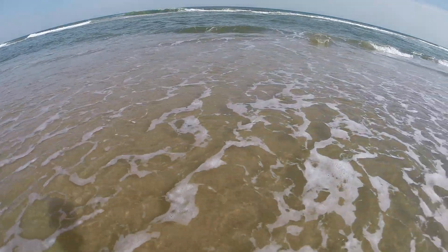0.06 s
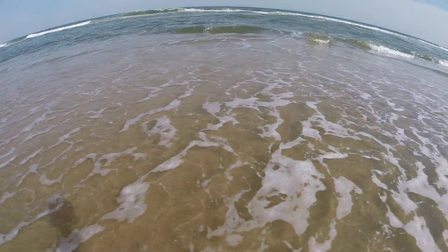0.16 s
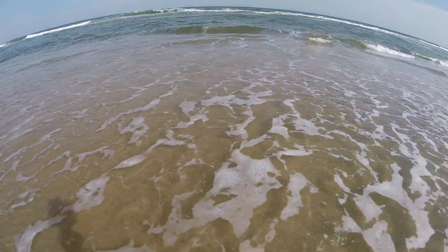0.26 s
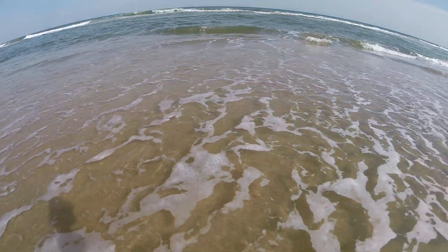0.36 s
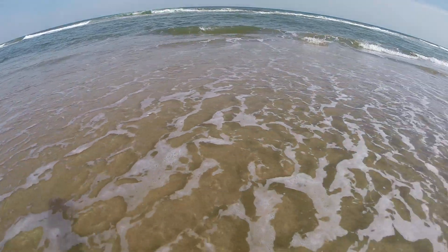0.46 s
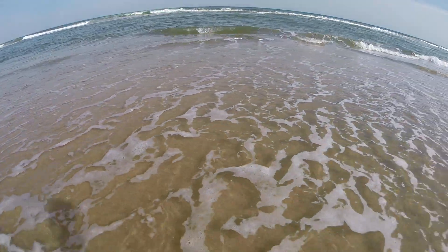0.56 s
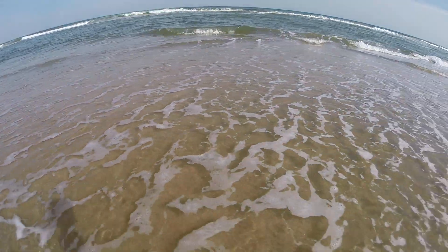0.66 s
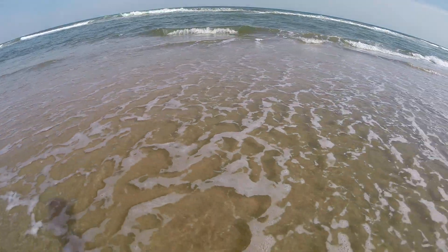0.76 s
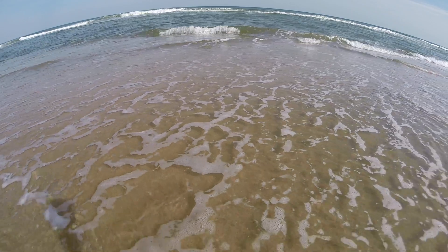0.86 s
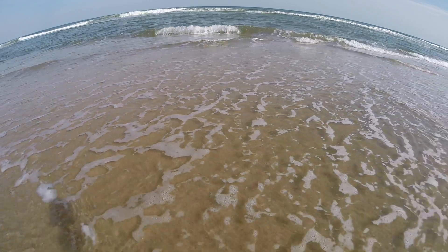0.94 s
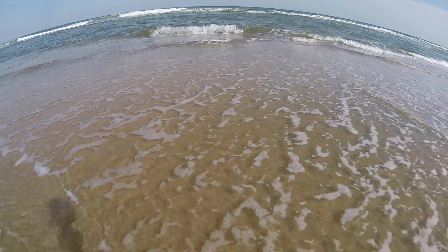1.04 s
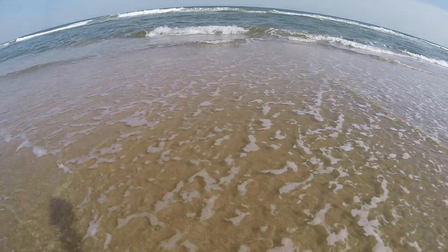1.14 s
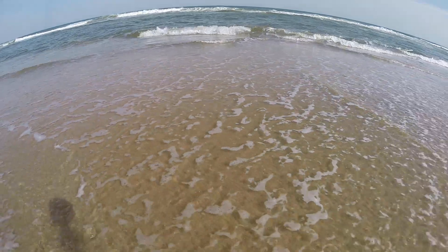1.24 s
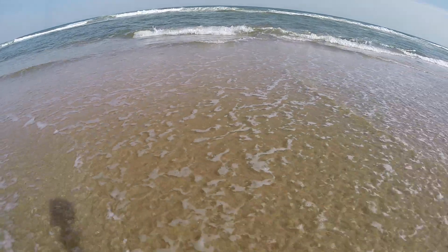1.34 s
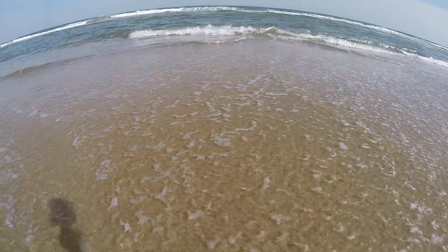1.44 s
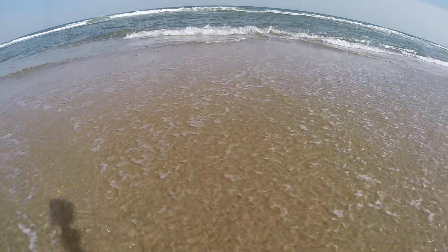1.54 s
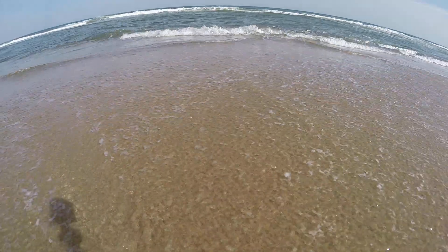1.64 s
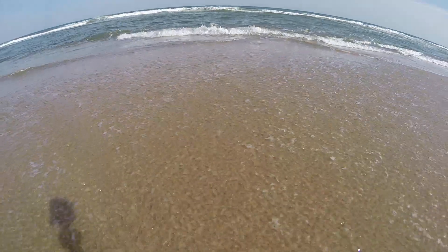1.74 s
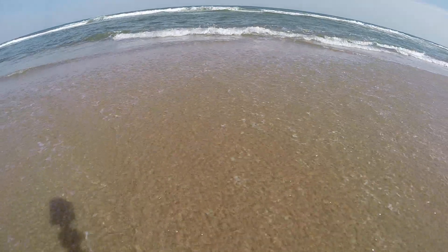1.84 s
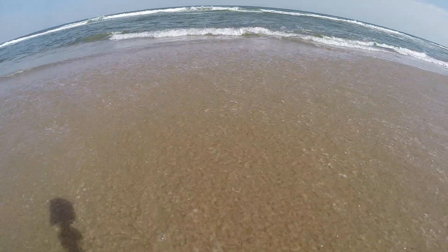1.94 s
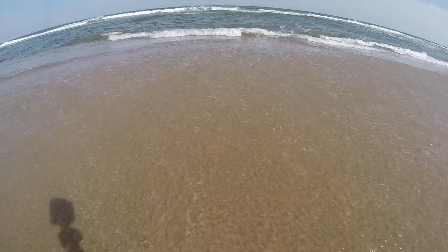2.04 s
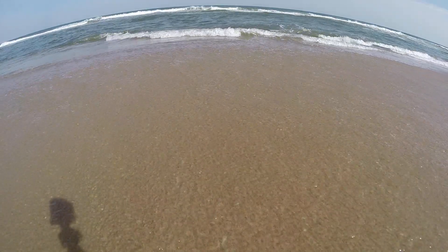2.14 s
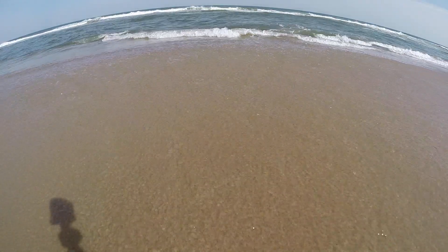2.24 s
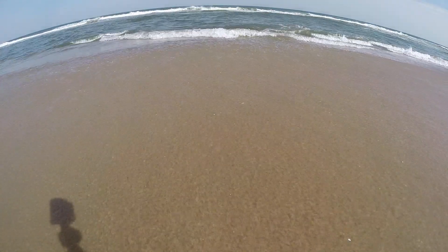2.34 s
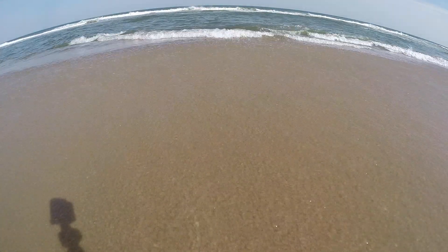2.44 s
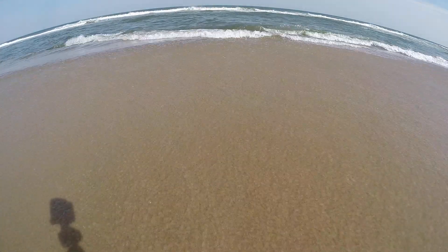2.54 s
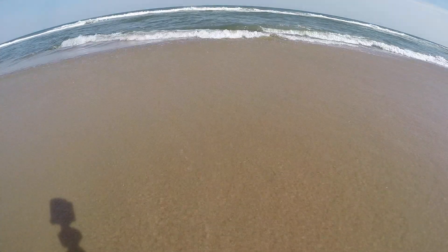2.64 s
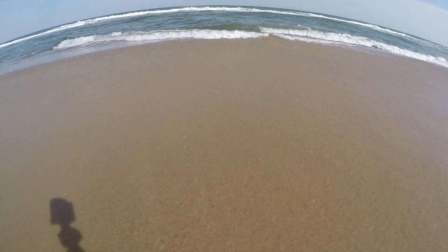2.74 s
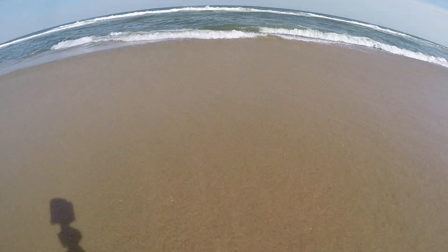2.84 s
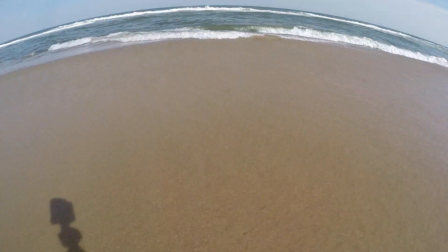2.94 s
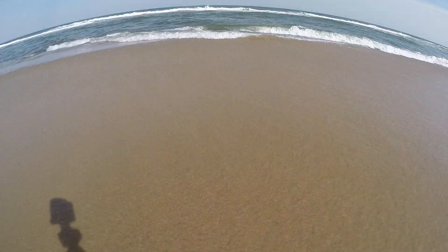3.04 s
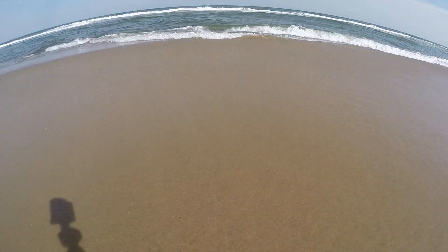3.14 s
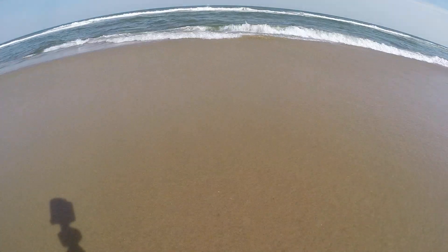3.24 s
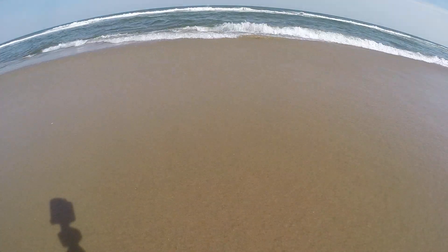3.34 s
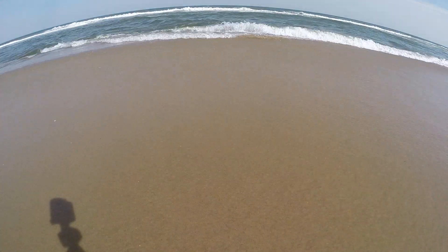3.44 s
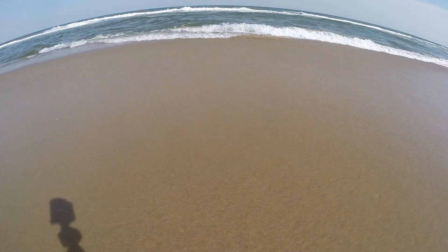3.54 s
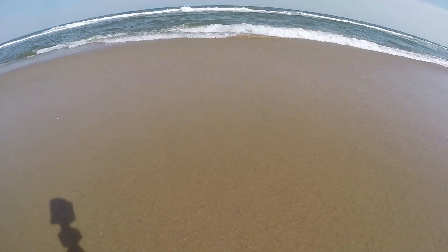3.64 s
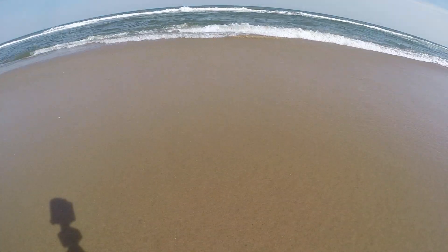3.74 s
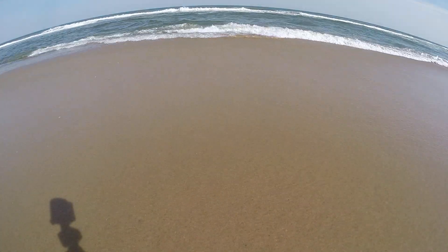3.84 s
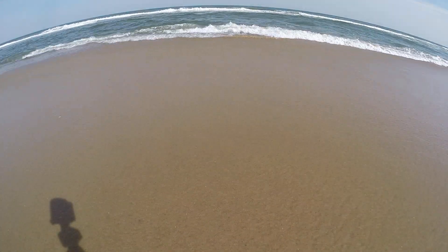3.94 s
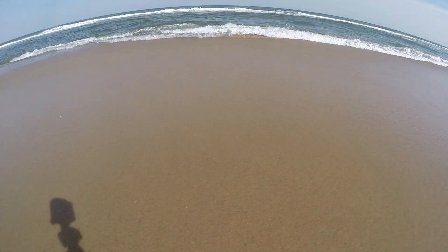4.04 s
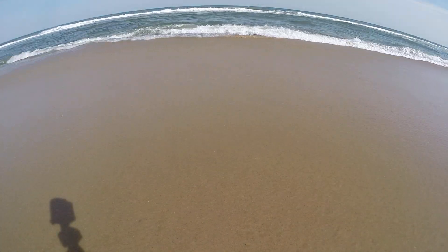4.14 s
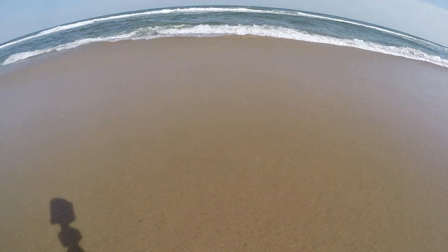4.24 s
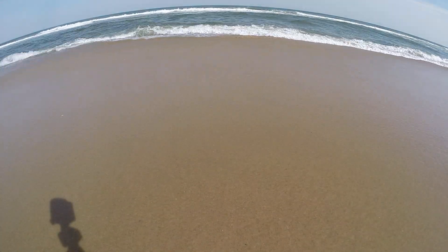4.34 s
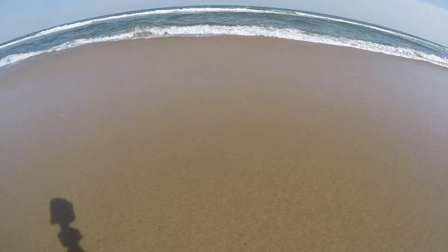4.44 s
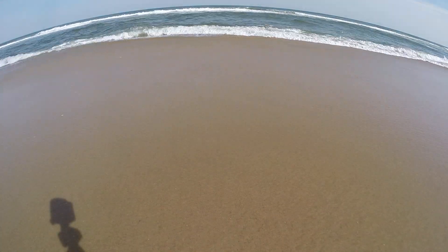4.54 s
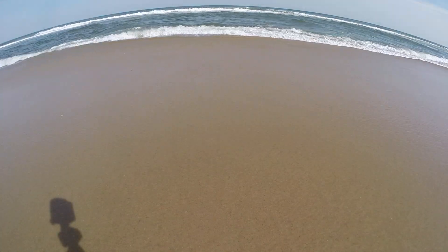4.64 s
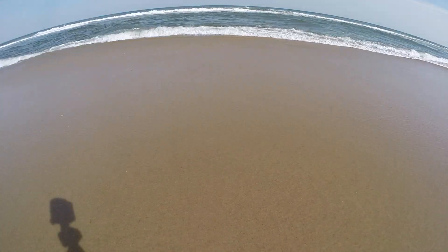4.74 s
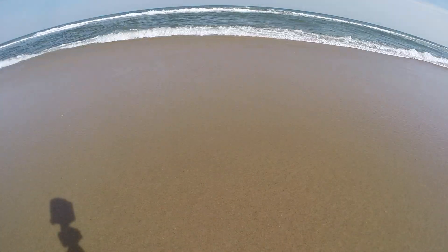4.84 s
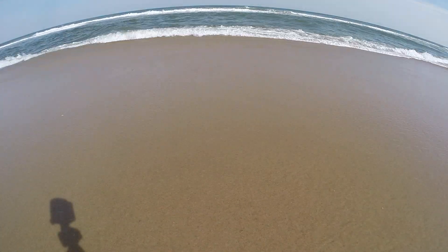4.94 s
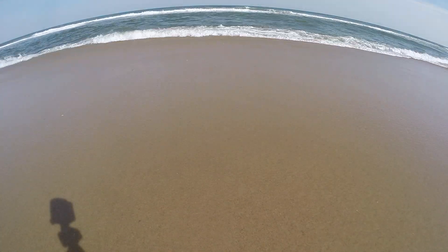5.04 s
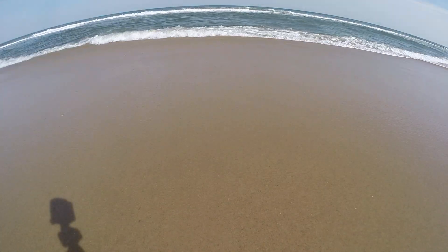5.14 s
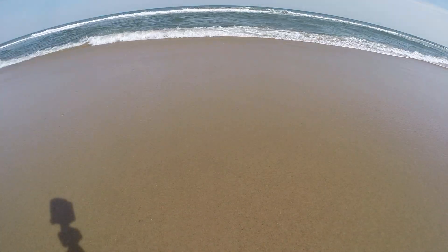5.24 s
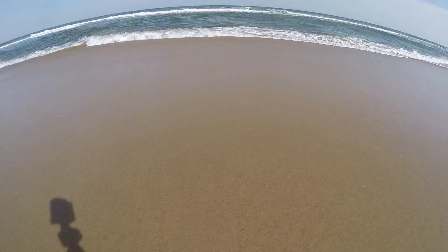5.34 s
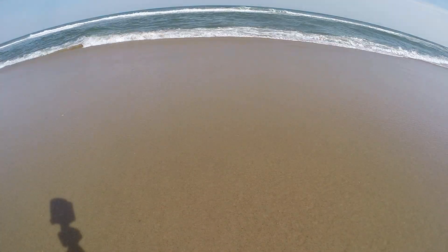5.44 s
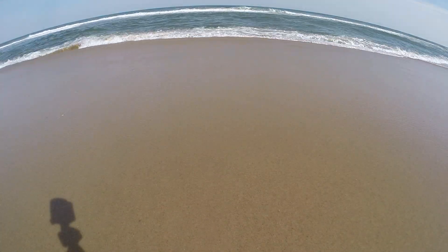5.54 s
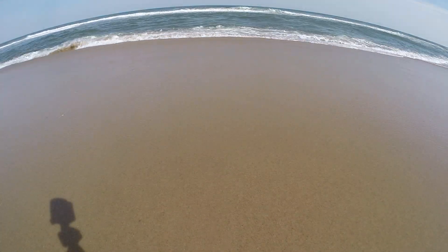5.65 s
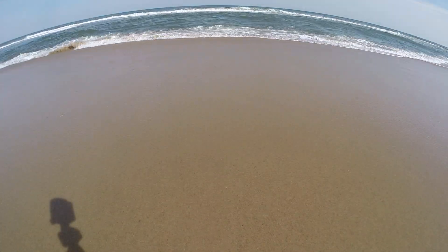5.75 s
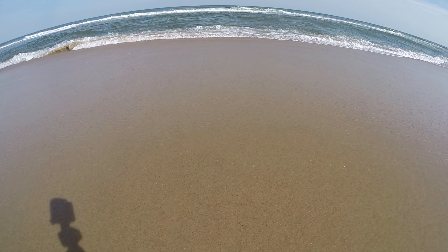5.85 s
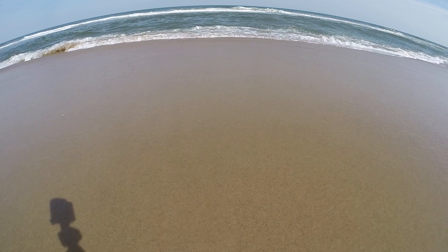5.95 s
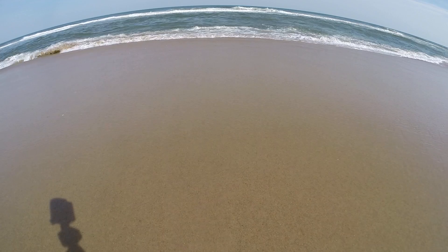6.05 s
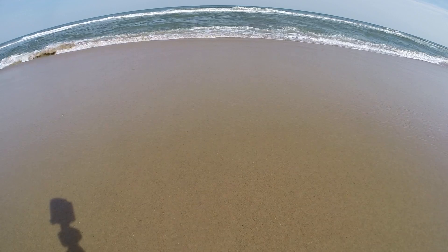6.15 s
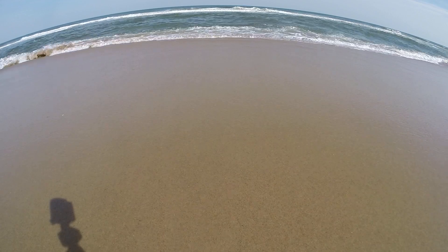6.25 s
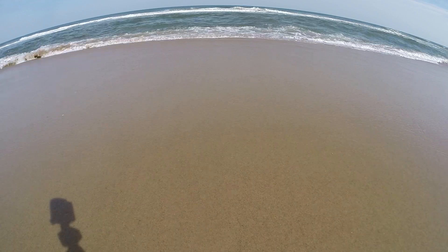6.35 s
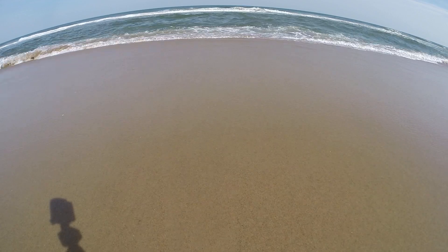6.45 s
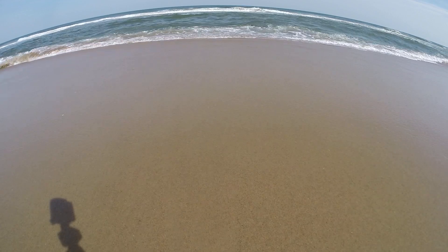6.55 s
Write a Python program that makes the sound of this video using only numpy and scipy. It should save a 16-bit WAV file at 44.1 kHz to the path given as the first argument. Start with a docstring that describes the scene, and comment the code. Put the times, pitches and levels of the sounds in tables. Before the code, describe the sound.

Very close, a mono microphone in a sealed housing hears bubbles popping and gurgling round its stand, with fine fizz, light taps and deep uneven vibration. The plopping is busy from the start, peaks in a loud knock-like plop before the middle, then thins out and stops before three seconds. Afterwards there is just soft far surf on an open beach, hissing a little brighter around five seconds, with a slight low breath of wind last.

```python
"""Plops, bright ticks and a gurgle come first: wave backwash runs round the stand of a microphone on wet sand.
Bubbles ring as dying sines, each plop's onset taps the housing wall, and the flow makes the stand hum, knock
and sway. Once the sand is bare, far surf is left: coloured noise shaped by the resonances of the sealed
housing. A faint breath of wind, low band noise, comes near the end."""
import sys
import numpy as np
from scipy import signal
from scipy.fft import rfft, irfft, next_fast_len
from scipy.io import wavfile
from scipy.ndimage import uniform_filter1d

SR = 44100
rng = np.random.default_rng(int(sys.argv[2]) if len(sys.argv) > 2 else 0)


def bounce(signal):
    """Save signal as a 16-bit WAV file at the path given by the first command-line argument."""
    frames = np.transpose(np.atleast_2d(signal))
    limited = np.clip(frames, -1, 1)
    pcm = np.round(limited * 32767).astype(np.int16)
    wavfile.write(sys.argv[1], SR, pcm)


N = 290619
TIME = np.arange(N) / SR


def from_db(db):
    """Logarithmic level: 20 dB is a tenfold amplitude."""
    return 10 ** (np.asarray(db) / 20)


def rms_one(x):
    """Normalisation by effective value: scaled to rms 1."""
    return x / np.sqrt(np.mean(x ** 2) + 1e-20)


def in_time(rows):
    """Envelope by linear interpolation: each column after the time, at every sample."""
    s, *columns = np.transpose(rows)
    return [np.interp(TIME, s, column) for column in columns]


def at_hz(points, hz):
    """Spectral envelope in dB, interpolated on a log-frequency axis."""
    point_hz, point_db = np.array(points).T
    return np.interp(np.log(hz), np.log(point_hz), point_db)


def drift(rate_hz):
    """Random modulation: white noise through two equal low-pass poles, scaled to rms 1."""
    step = 40  # samples between computed values
    pole = np.exp(-2 * np.pi * rate_hz * step / SR)
    settle = 2000
    white = rng.standard_normal(N // step + 2 + settle)
    slow = signal.lfilter([1], [1, -2 * pole, pole * pole], white)[settle:]
    return np.interp(np.arange(N) / step, np.arange(len(slow)), rms_one(slow))


def band(low_hz, high_hz):
    """Band-limited noise: white noise through a band-pass, rms 1."""
    sos = signal.butter(2, [low_hz, high_hz], "band", fs=SR, output="sos")
    return rms_one(signal.sosfilt(sos, rng.standard_normal(N)))


# Wind on the port: (time [s], level [dB])
GUST = [(6.1, -82), (6.2, -53), (6.3, -55), (6.4, -73), (6.5, -54), (6.59, -60)]


def wind():
    """Turbulent pressure at the port: low band noise that follows the gust."""
    gust_db, = in_time(GUST)
    return from_db(gust_db) * band(22, 120)


# Resonances of the housing, peaks and hollows: (centre [Hz], width [Hz], level [dB])
HOUSING = [(1620, 170, 5.5), (1972, 91, -9.5), (2840, 790, 1), (3265, 130, -7), (3360, 120, 3),
           (3954, 130, -7), (4460, 400, -2), (5060, 280, -7), (5400, 320, 2.5)]


def surf_noise(spectrum, patchy_db):
    """Filtering by resonance: housing-coloured noise whose half-octave bands swell partly together, partly alone."""
    size = next_fast_len(N)
    hz = np.maximum(np.arange(size // 2 + 1) * SR / size, 1)
    housing_db = sum(db / (1 + (2 * (hz - centre) / width) ** 2) for centre, width, db in HOUSING)
    whole = rfft(rng.standard_normal(size)) * from_db(at_hz(spectrum, hz) + housing_db)
    together = drift(3.0)
    out = 0
    low, high = 2 * np.log2(spectrum[0][0]), 2 * np.log2(spectrum[-1][0])  # in half octaves
    for centre in np.arange(np.floor(low) - 1, high + 2):
        share = np.clip(1 - np.abs(2 * np.log2(hz) - centre), 0, 1)  # overlapping triangles
        swell_db = patchy_db * (.3 * together + drift(7.3))
        out = out + irfft(whole * share, size)[:N] * from_db(swell_db)
    return rms_one(out)


# Far surf: (time [s], roar level [dB], hiss level [dB])
SURF = [(0, -49.5, -54), (1.4, -46.5, -46.5), (2.2, -48.5, -49), (3, -48, -49.5), (3.45, -47, -48),
        (4.3, -49, -50.5), (5.1, -49, -47.5), (5.7, -51.5, -51.5), (6.59, -51, -52)]
# Relative spectra of roar, hiss, foam and faint top: (frequency [Hz], density [dB per Hz])
ROAR = [(13, -29), (22, 2.5), (49, -4), (81, -3), (107, -4), (764, -7.5), (1070, -9.5), (1630, -10),
        (2000, -8.5), (2600, -46), (4400, -120)]
HISS = [(1180, -43), (2000, -13), (2770, -2), (3200, -5), (3470, -6), (4060, -12.5), (4580, -8.5),
        (8000, -31), (10400, -53), (17600, -120)]
FOAM = [(2600, -31), (3100, -6), (3450, 0.5), (4200, -0.5), (4800, -10), (5400, -27), (7000, -47)]
AIR = [(3820, -25), (6500, -2), (7320, -4), (8400, -13), (9600, -6), (11800, -14.5), (14700, -14.5),
       (15400, -18)]
# A spreading wave foams up to a peak, then settles at a lasting level
FOAM_QUIET_DB, FOAM_PEAK_DB, FOAM_LASTING_DB = -62.5, -51, -53
FOAM_PEAK_S, FOAM_RISE_DB_PER_S, FOAM_FALL_DB_PER_S = 5.08, 7.5, 8
TOP_DB, TOP_FALL_DB_PER_S = -66.5, 0.4  # level at the start and its steady fall


def surf():
    """Incoherent sum of far breakers: a dull roar, a hiss, brighter foam and a faint top."""
    roar_db, hiss_db = in_time(SURF)
    late = TIME - FOAM_PEAK_S
    slope_db = np.minimum(FOAM_RISE_DB_PER_S * late, -FOAM_FALL_DB_PER_S * late)
    floor_db = np.where(late < 0, FOAM_QUIET_DB, FOAM_LASTING_DB)
    foam_db = np.maximum(floor_db, FOAM_PEAK_DB + slope_db)
    top_db = TOP_DB - TOP_FALL_DB_PER_S * TIME
    roar = from_db(roar_db) * surf_noise(ROAR, patchy_db=0.5)
    hiss = from_db(hiss_db) * surf_noise(HISS, patchy_db=.35)
    foam = from_db(foam_db) * surf_noise(FOAM, patchy_db=.35)
    top = from_db(top_db) * surf_noise(AIR, patchy_db=1.3)
    return roar + hiss + foam + top


# How hard the flow shakes the stand: (time [s], hum level [dB])
STAND = [(0.0, -44), (0.17, -42), (0.25, -60), (0.44, -53.5), (0.5, -62), (0.55, -44.5), (0.63, -50.5),
         (0.9, -37), (0.96, -42.5), (0.99, -55), (1.24, -39), (1.44, -39), (1.55, -58.5), (1.78, -40.5),
         (1.82, -59), (1.88, -43.5), (2.02, -41), (2.06, -50), (2.2, -47), (2.24, -55.5), (2.68, -50),
         (2.9, -68)]
# Higher knock of the stand: (time [s], level at a hum of -45 dB [dB])
KNOCK = [(0, -51), (.2, -59), (.7, -58.5), (1.1, -54), (1.45, -49), (1.7, -53), (2.05, -49), (2.5, -53),
         (2.8, -68)]
HUM_HZ, HUM_WAVER_HZ = 75.5, 52  # pitch; rate of the level's waver
KNOCK_HZ, KNOCK_HALF_WIDTH_HZ = 348, 64
KNOCK_FOLLOWS, KNOCK_CHANCE_DB = .25, 3.5  # share of the hum's swing; own wander
SWAY_DB, SWAY_CHANCE_DB = -50, 5.5  # at a hum of -45 dB and a gurgle of -40 dB; own wander
SWAY_FOLLOWS, SWAY_WASH = 0.89, .6  # shares of the swings of hum and gurgle


def stand():
    """Flow-excited vibration: a wavering low mode, a higher knock and a slow sway."""
    hum_db, = in_time(STAND)
    gurgle_db, = in_time(WASH)
    hum_swing_db, wash_swing_db = hum_db + 45, gurgle_db + 40
    sway_db = SWAY_DB + SWAY_FOLLOWS * hum_swing_db + SWAY_WASH * wash_swing_db
    sway_db = sway_db + SWAY_CHANCE_DB * drift(4.2)
    knock_db = in_time(KNOCK)[0] + KNOCK_FOLLOWS * hum_swing_db + KNOCK_CHANCE_DB * drift(8.4)
    waver = from_db(2.0 * drift(HUM_WAVER_HZ))
    hum_cycles = np.cumsum(HUM_HZ + 4 * drift(8.0)) / SR
    hum = np.sqrt(2) * waver * np.sin(2 * np.pi * hum_cycles)
    knock = band(KNOCK_HZ - KNOCK_HALF_WIDTH_HZ, KNOCK_HZ + KNOCK_HALF_WIDTH_HZ)
    sway = band(6.7, 64)
    wet = np.clip((STAND[-1][0] - TIME) / 0.14, 0, 1)  # fades out as the flow ends
    return wet * (from_db(hum_db) * hum + from_db(sway_db) * sway + from_db(knock_db) * knock)


# Modes of the housing wall: (frequency [Hz], level [dB], t60 [s])
WALL = [(940, -6.5, 0.021), (1474, 4, 0.0073), (2036, 0.5, 0.015), (2644, -8, 0.031), (4505, -15, 0.02),
        (5580, -17.5, 0.027), (6020, -30.5, 0.039)]
TAP_DB, PATTER_DB = -23, -6.5  # relative to the plop's peak; to the gurgle


def wall(gurgle_db):
    """Modal excitation: plops and pattering spray strike the wall, each mode with a strength of its own."""
    plop_s, plop_db = np.array(PLOPS)[:, :2].T
    at = np.round(plop_s * SR).astype(int)
    drops_per_s = 500 * from_db(6 * drift(15))
    drop_db = gurgle_db + PATTER_DB + 4.2 * rng.exponential(1, N).clip(0, 4)
    spray = (rng.random(N) < drops_per_s / SR) * from_db(drop_db)
    spray[int(WASH[-1][0] * SR):] = 0
    out = np.zeros(N)
    for hz, level_db, t60 in WALL:
        clicks = spray * rng.standard_normal(N)
        clicks[at] += from_db(plop_db + TAP_DB + rng.normal(0, 7.1, len(at)))
        r, w = from_db(-60 / (t60 * SR)), 2 * np.pi * hz / SR  # decay and phase per sample
        # the tiny offset keeps the filter clear of vanishingly small numbers
        ring = signal.lfilter([0, np.sin(w)], [1, -2 * r * np.cos(w), r * r], clicks + 1e-18)
        out += from_db(level_db) * ring
    return out


BURST_SHARE = 0.66  # a bubble bursts at the surface after about this share of its t60


def bubbles(s, peak_db, hz, t60, rise, attack_ms, rough=0):
    """Damped volume oscillation: dying sines of gliding pitch, cut off by the burst; churning adds flutter."""
    length = 4096
    t = np.arange(length)[None] / SR
    settings = np.broadcast_arrays(s, peak_db, hz, t60, rise, attack_ms)
    s, peak_db, hz, t60, rise, attack_ms = (np.reshape(v, (-1, 1)) for v in settings)
    onset = (1 - np.exp(-2000 * t / np.maximum(attack_ms, .1))) ** 2
    decay = from_db(-60 * t / np.maximum(t60, .003))
    burst = np.exp(-((t - attack_ms / 2000) / (BURST_SHARE * t60)) ** 4)
    shape = onset * decay * burst
    shape = shape / shape.max(axis=1, keepdims=True)
    # phase flutter: a new value every 32 samples, smoothed
    flutter = rms_one(uniform_filter1d(rng.standard_normal((len(s), length // 32)), size=3))
    flutter = uniform_filter1d(np.repeat(flutter, 32, axis=1), size=32)
    cycles = hz * (t + rise * t ** 2 / 2)  # pitch changes by the share "rise" per second
    sound = from_db(peak_db) * shape * np.sin(2 * np.pi * cycles + rough * flutter)
    at = np.round(s * SR).astype(int) + np.arange(length)
    return np.bincount(at.ravel(), sound.ravel(), N + length)[:N]


def swarm(spectrum, low_hz, high_hz, cycles, spread_db, clump_db, count):
    """Random point process: small bubbles in clumps while water runs, a few much louder; rms 1 meanwhile."""
    when, pitch, size, climb = rng.random((count, 4)).T
    running = int(WASH[-1][0] * SR)
    crowding = np.cumsum(from_db(clump_db * drift(14)[:running]))
    s = np.interp(when * crowding[-1], crowding, TIME[:running])
    hz = low_hz * (high_hz / low_hz) ** pitch
    level_db = at_hz(spectrum, hz) - spread_db * np.log(size + .03)
    t60 = cycles / hz
    rise = 24 * climb - 6  # share per second
    sound = bubbles(s, level_db, hz, t60, rise, attack_ms=0.58, rough=.18)
    return sound / np.sqrt(np.mean(sound[:running] ** 2))


# Backwash running past the stand: (time [s], small gurgle level [dB])
WASH = [(0, -35), (.11, -41), (.2, -41), (.45, -43), (.58, -39.5), (.7, -43.5), (.9, -42.5), (1.1, -37.5),
        (1.35, -38), (1.6, -38.5), (1.75, -40), (1.9, -38), (2.05, -36), (2.22, -42.5), (2.5, -46.5),
        (2.7, -51), (2.85, -78)]
# Loudest bubbles at the stand, before the low-pass:
# (time [s], peak level [dB], pitch [Hz], t60 before bursting [s], pitch rise [share per s], attack [ms])
PLOPS = [(0.0015, -24.5, 2560, 0.036, 10, 1.1), (0.027, -27, 2680, .033, 3, .7),
         (0.0689, -23.5, 2190, 0.013, -5, 4), (0.1348, -23, 1205, .033, 39, .8),
         (0.1393, -26, 1920, 0.055, 5, 0.6), (0.1493, -21.5, 1165, 0.05, -1, 0.78),
         (0.1546, -17.5, 1580, 0.029, -13, 0.44), (0.1604, -23, 1960, .022, 12, 3.6),
         (0.2126, -26.5, 1270, .021, -11, 4.6), (0.2142, -25, 1530, .047, 19, .7),
         (0.218, -17.5, 2090, 0.015, -8, 0.8), (0.232, -25.5, 1310, .017, 0, 4),
         (0.2873, -19.5, 1310, 0.04, 0, .9), (0.295, -23.5, 1870, 0.019, -7, 3.5),
         (0.333, -28, 1360, .028, -14, 3.7), (0.3478, -25, 2690, .015, 9, 0.78),
         (0.352, -19, 1006, .022, 30, 3.6), (0.3886, -25, 985, .028, 7, 4.1),
         (0.4153, -29, 1580, 0.048, 3, .7), (0.451, -19.5, 1480, .01, 2, 0.24),
         (0.4593, -28, 2300, .032, -7, 0.63), (0.465, -23, 1380, 0.015, 4, 3.6),
         (0.4906, -27, 940, 0.016, -17, .8), (0.4915, -25.5, 1760, 0.062, -4, .7),
         (0.4938, -29, 1397, 0.068, 28.5, 4.9), (0.527, -24.5, 1660, .055, -10, .7),
         (0.5597, -26.5, 1130, .037, 4, 1.2), (0.6065, -29, 2060, .015, -9, .6),
         (0.6206, -27, 2100, .024, 10, .7), (0.638, -17, 1345, 0.02, 16, 3.9),
         (0.739, -31, 1284, .032, -4, .7), (0.798, -24.5, 1354, 0.019, 30, 4),
         (0.827, -18, 1033, 0.023, 10, 0.38), (0.835, -23.5, 2675, .023, -5, 4.9),
         (0.8937, -22.5, 1400, 0.023, 26, 0.87), (0.8952, -23, 1710, 0.021, 29, 4),
         (0.9532, -18, 1230, 0.022, 2, 3.8), (0.9681, -28, 2190, .015, -17, .55),
         (0.9845, -27, 2110, 0.017, 26, .7), (1.0124, -22.5, 1390, 0.02, 11, 4),
         (1.03, -23.5, 2010, .036, 9, .7), (1.0434, -26, 1500, .065, 10, .7),
         (1.0585, -24, 1980, 0.017, -14, .8), (1.0783, -26.5, 1220, .034, -13, 0.87),
         (1.123, -26.5, 2240, .05, -1.5, .8), (1.1487, -26, 1660, 0.023, 30, .7),
         (1.163, -23.5, 1010, 0.056, 5.5, 0.98), (1.164, -23.5, 1310, .018, -9, .8),
         (1.184, -24, 1080, 0.13, 6.5, .7), (1.2184, -19.5, 1810, 0.071, -8.5, 1.3),
         (1.22, -24, 1200, 0.1, -9, 0.76), (1.2589, -20, 1190, .022, 1.5, .8),
         (1.2855, -17.5, 1534, .024, -2.5, 3.7), (1.312, -25, 2180, 0.017, 1, 4),
         (1.4169, -7.5, 2700, 0.016, 1, 0.47), (1.4177, -10, 1980, 0.018, -1, 0.27),
         (1.419, -14, 3060, 0.024, 4, 1.6), (1.4218, -3.5, 1603, .038, 31, .8),
         (1.429, -18, 2540, 0.016, 12, .7), (1.446, -10.5, 866, 0.024, 12, 28),
         (1.4455, -15, 1410, 0.012, 2, .4), (1.4474, -20, 2700, .011, 8, .6),
         (1.448, -22.5, 356, 0.021, -1, 1.5), (1.463, -20.5, 1950, 0.03, -23, 2.2),
         (1.475, -17.5, 2030, 0.0099, 1, 0.45), (1.487, -19.5, 1570, 0.024, 2, 3.7),
         (1.536, -19, 1383, 0.045, 24, 3.1), (1.536, -12, 1740, .006, 0, 0.33),
         (1.5655, -25.5, 1094, 0.06, 5.5, 3.8), (1.6606, -28, 874, 0.15, 13, 3),
         (1.678, -20.5, 2000, 0.033, -2, 1.1), (1.685, -28, 1150, .045, 31, 4),
         (1.7017, -19, 1380, 0.02, 2, 4), (1.745, -28.5, 2000, 0.019, 11, .6),
         (1.915, -24.5, 1180, 0.031, -4, 0.33), (1.9798, -7, 2100, 0.015, 20, 1.8),
         (2.025, -25.5, 1910, 0.14, -13, 3.2), (2.061, -21.5, 1800, 0.041, 7, 1.1),
         (2.0737, -17.5, 2030, .03, -14, .7), (2.081, -19, 1880, .038, 18.5, 1.1),
         (2.093, -13.5, 2010, 0.012, 10, 1.1), (2.1, -20, 2660, 0.017, 4, 0.63),
         (2.1, -11.5, 2080, 0.027, 4, 0.91), (2.155, -19.5, 1056, .029, 11, 4.8),
         (2.168, -17.5, 1066, 0.034, 11, 1.9), (2.1966, -15, 1440, 0.034, 16, 0.52),
         (2.289, -27.5, 1220, 0.02, 13, .7), (2.3708, -26.5, 2693, 0.028, -0.5, 4.3),
         (2.376, -26, 1310, 0.027, 23, 3.6), (2.4819, -20, 1220, 0.03, 20, 0.32),
         (2.5582, -17.5, 1820, 0.025, 23, 0.75), (2.6675, -25, 1370, .021, 4, 4),
         (2.7026, -16, 1160, 0.054, 8.5, 2.8), (2.704, -29.5, 2600, 0.018, 7, 4),
         (2.735, -34, 1960, .023, 0, 1.1), (2.777, -37.5, 2180, 0.023, 0, 1.1)]
# Loudest tiny bright bubbles: (time [s], peak level [dB], pitch [Hz])
TICKS = [(0.0074, -30, 5400), (0.0318, -29, 5400), (0.1122, -27, 5430), (0.1391, -33.5, 4540),
         (0.3212, -29.5, 4630), (0.4914, -24.5, 4950), (0.522, -24, 5300), (0.5604, -32, 4500),
         (0.6983, -35, 4200), (0.7208, -27, 5300), (0.761, -40, 6540), (0.8235, -37, 5980),
         (0.9423, -38, 6000), (0.963, -26.5, 4580), (1.1433, -36, 4700), (1.2161, -27, 4160),
         (1.263, -33, 4600), (1.3004, -31.5, 4500), (1.3646, -31, 4740), (1.3944, -29, 4970),
         (1.4378, -32, 4780), (1.4543, -33, 5370), (1.469, -30.5, 4910), (1.5783, -37, 4650),
         (1.6133, -34, 4370), (1.712, -26.5, 4420), (1.8417, -32.5, 4700), (1.8986, -35, 4750),
         (1.956, -39, 5600), (1.8647, -28.5, 5400), (1.8788, -28, 5260), (2.0617, -27.5, 4600),
         (2.089, -32, 3950), (2.258, -22.5, 4650), (2.275, -31.5, 5400), (2.4487, -34, 4000),
         (2.4823, -35.5, 4600), (2.61, -36, 5070), (2.7766, -37.5, 5660)]
# How loud small bubbles are by pitch: (pitch [Hz], relative level [dB])
GURGLE = [(350, -57), (600, -21), (792, -24), (927, -6), (1350, 2.5), (1770, -1.5), (2190, 4.5),
          (2460, -17.5), (2710, -1), (3170, -4), (3600, -24), (4680, -61), (7920, -120)]
TICK_T60_S = 0.011
FIZZ_DB, FIZZ_FOLLOWS = -58, .3  # at a gurgle of -40 dB; share of the gurgle's swing


def backwash():
    """Superposition of bubble tones: plops and ticks, gurgle and fizz between them, and taps on the wall."""
    gurgle_db, = in_time(WASH)
    fizz_db = FIZZ_DB + FIZZ_FOLLOWS * (gurgle_db + 40)
    gurgle = swarm(GURGLE, 737, 3405, cycles=49, spread_db=4.5, clump_db=6, count=680)
    # (pitch [Hz], relative level [dB])
    fizz_spectrum = [(4000, -8), (4600, -4.0), (5100, 2.5), (5500, 8), (6300, -21), (8500, -17)]
    fizz = swarm(fizz_spectrum, 4010, 9600, cycles=44, spread_db=4.5, clump_db=4, count=520)
    plops = bubbles(*np.transpose(PLOPS), rough=.2)
    tick_s, tick_db, tick_hz = np.transpose(TICKS)
    ticks = bubbles(tick_s, tick_db, tick_hz, TICK_T60_S, rise=0, attack_ms=.3, rough=.4)
    # big bubbles have no bright edge
    low_pass = signal.butter(4, 3600, fs=SR, output="sos")
    muffled = signal.sosfilt(low_pass, plops + from_db(gurgle_db) * gurgle)
    bright = ticks + from_db(fizz_db) * fizz
    tap_band = signal.butter(4, [800, 6500], "band", fs=SR, output="sos")
    taps = signal.sosfilt(tap_band, wall(gurgle_db))
    return muffled + bright + taps


def scene():
    """Linear superposition: wind, far surf, stand and near water add up in one channel."""
    return (wind() + surf() + stand() + backwash())[None]


def record(dry):
    """Band limiting: the deepest bass is rolled off, the top is cut steeply."""
    bass_cut = signal.butter(2, 28, "high", fs=SR, output="sos")
    top_cut = signal.ellip(14, .5, 60, 15350, fs=SR, output="sos")  # ripple and stop-band in dB, edge in Hz
    return signal.sosfilt(top_cut, signal.sosfilt(bass_cut, dry))


dry = scene()
out = record(dry)
bounce(out)
```